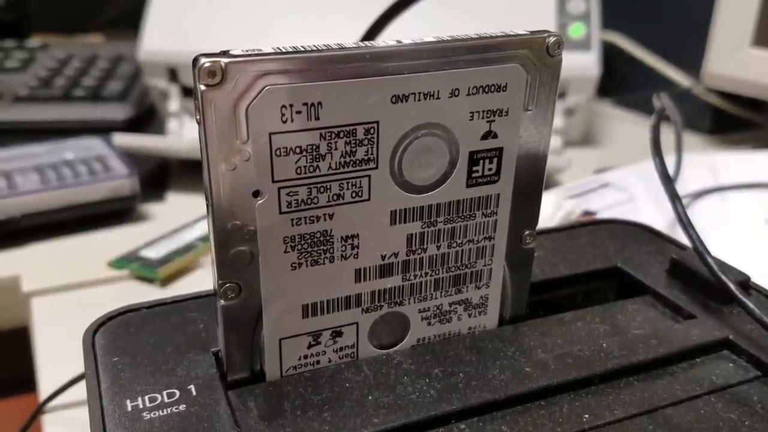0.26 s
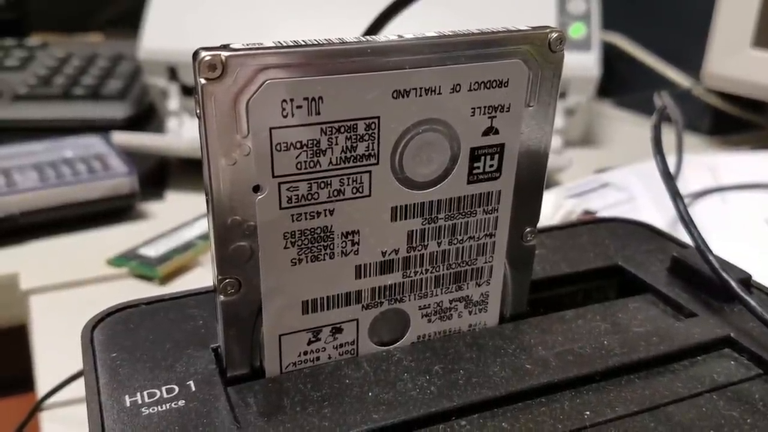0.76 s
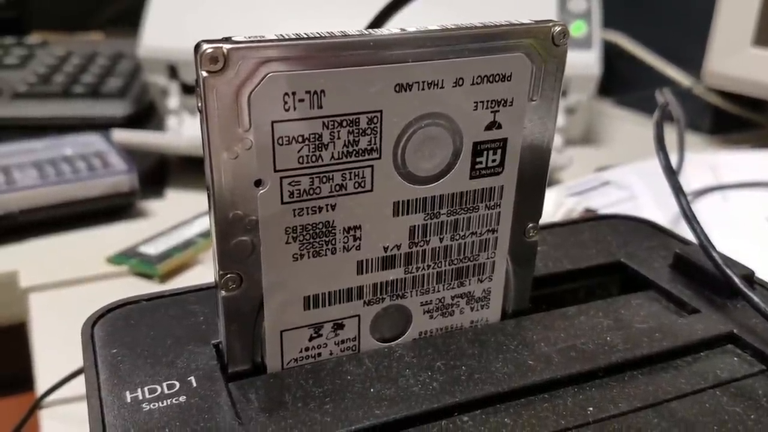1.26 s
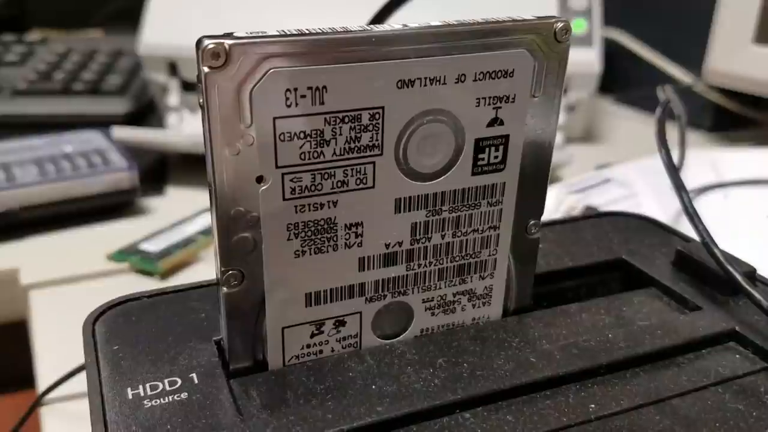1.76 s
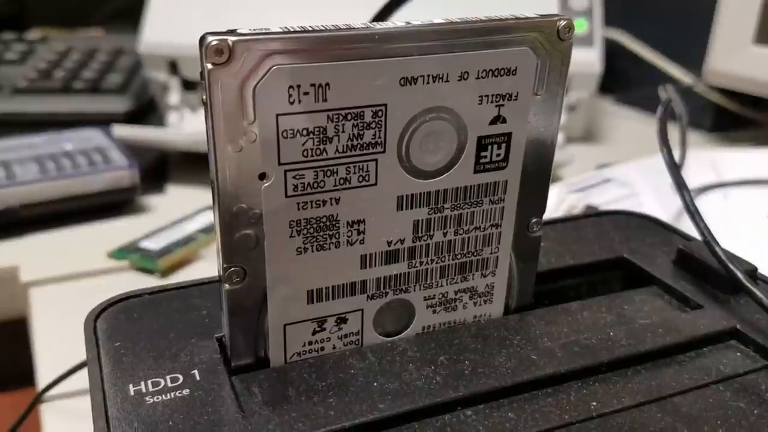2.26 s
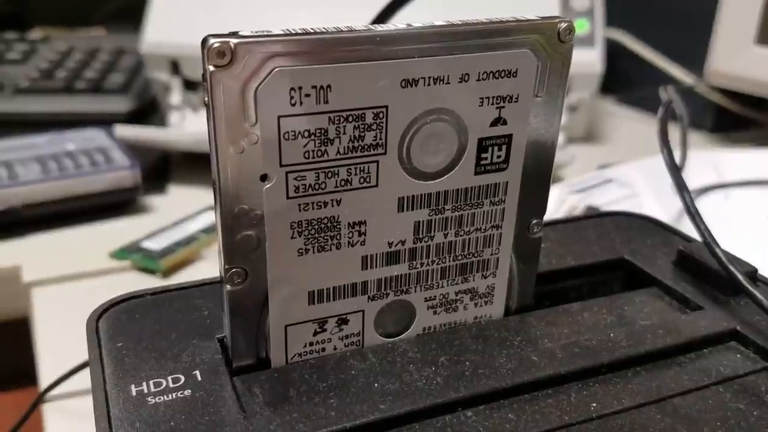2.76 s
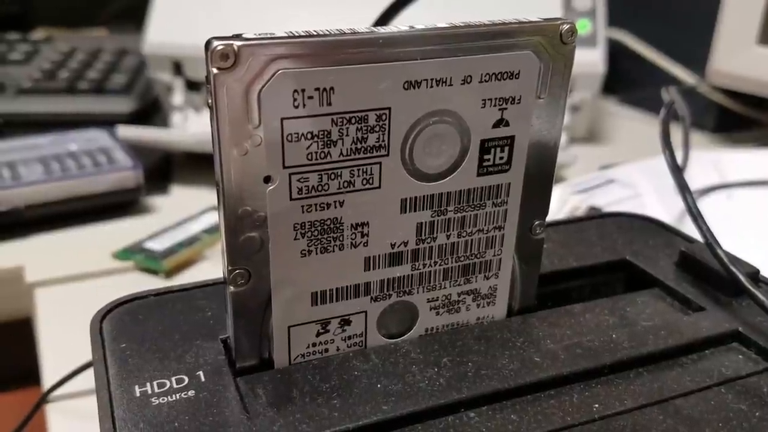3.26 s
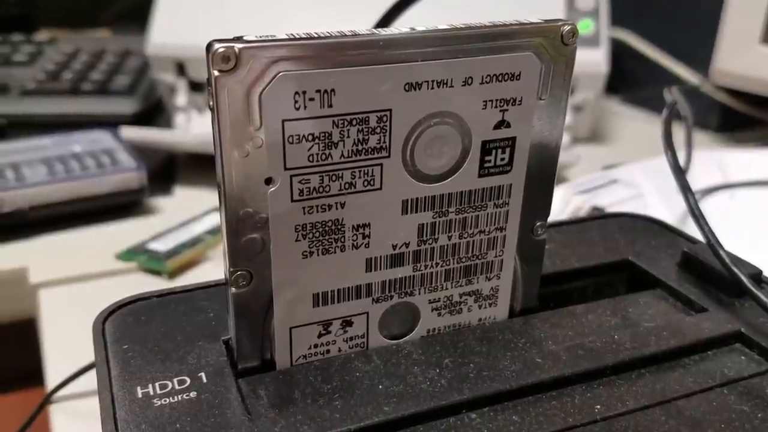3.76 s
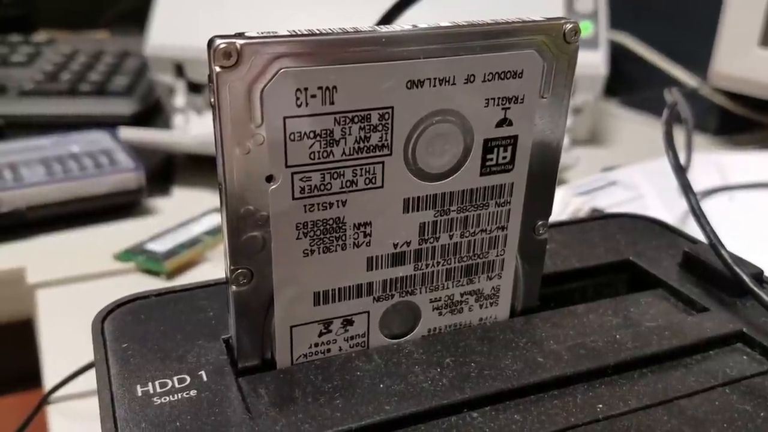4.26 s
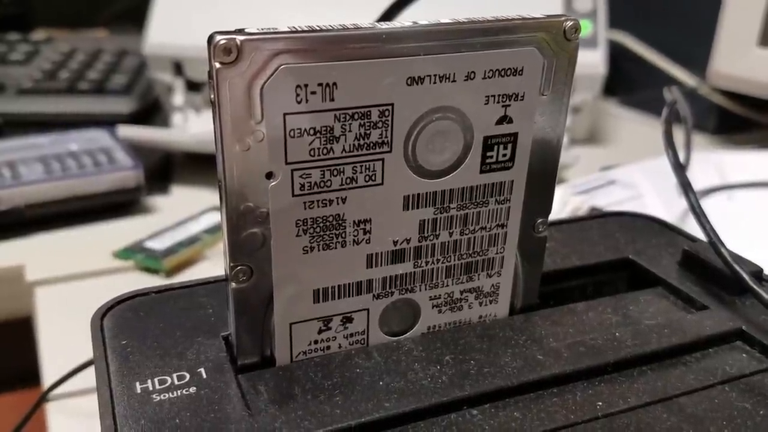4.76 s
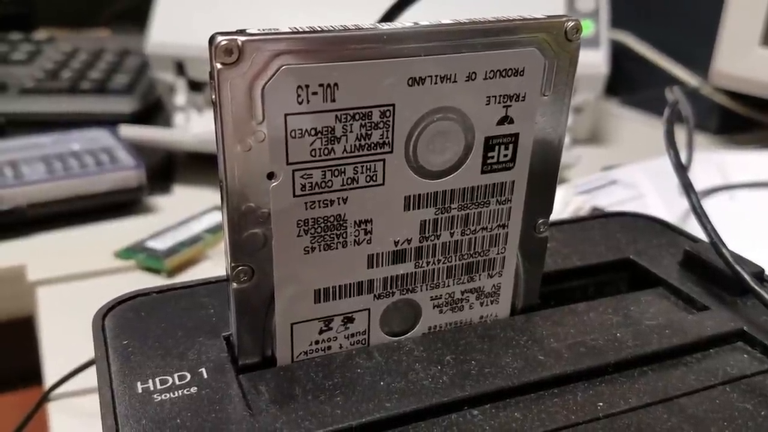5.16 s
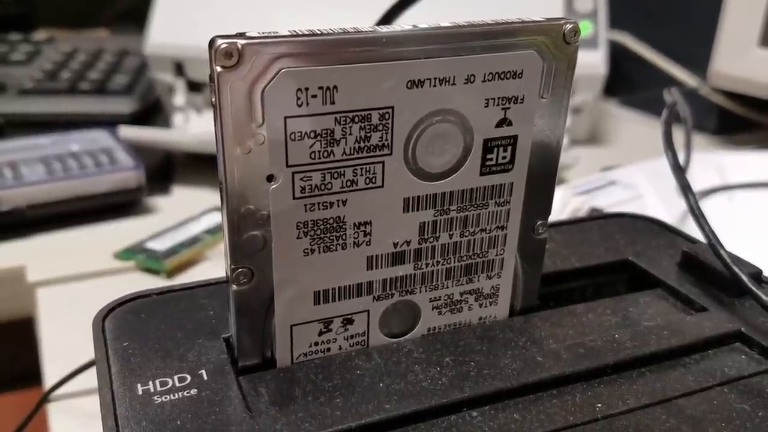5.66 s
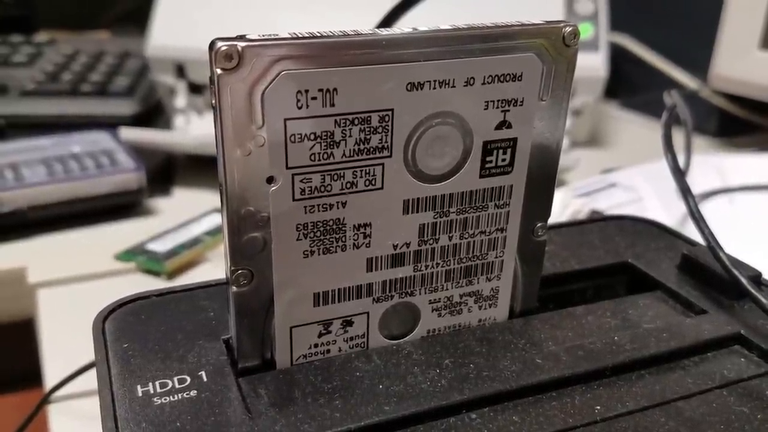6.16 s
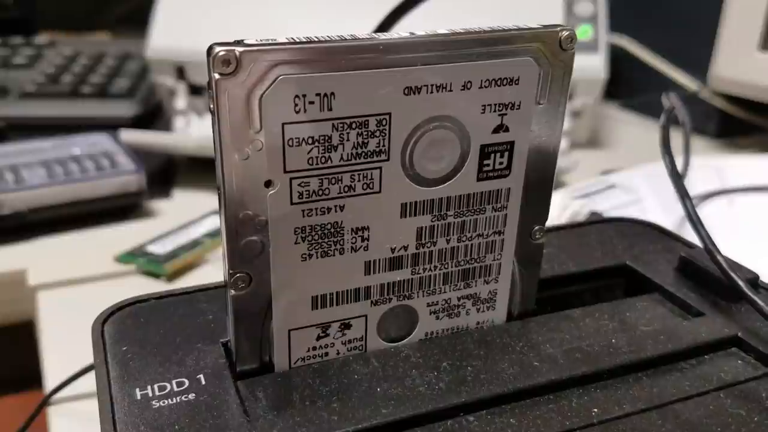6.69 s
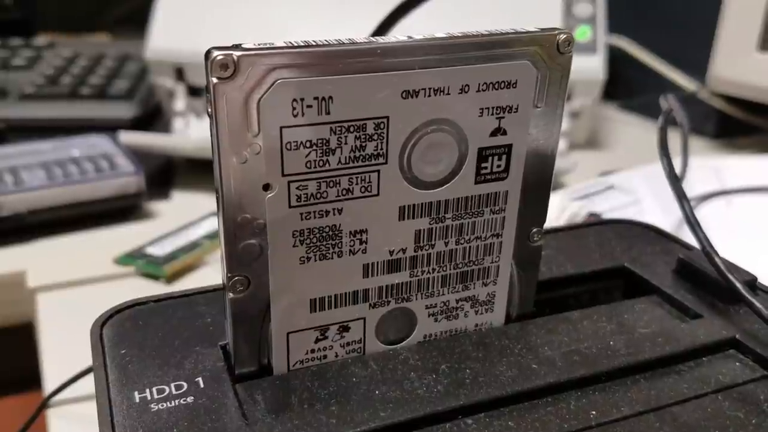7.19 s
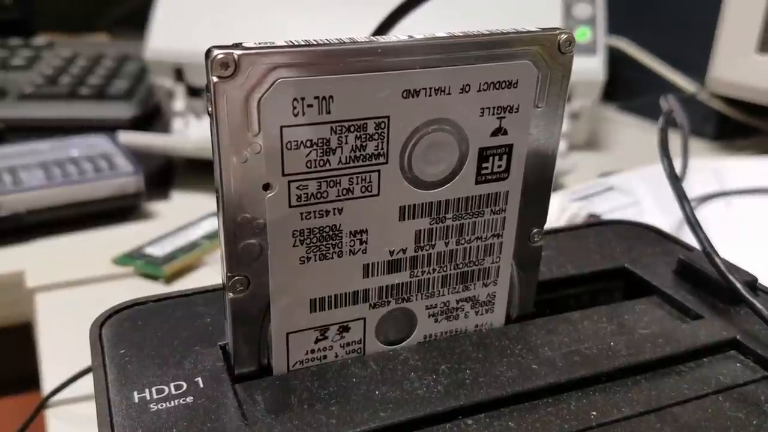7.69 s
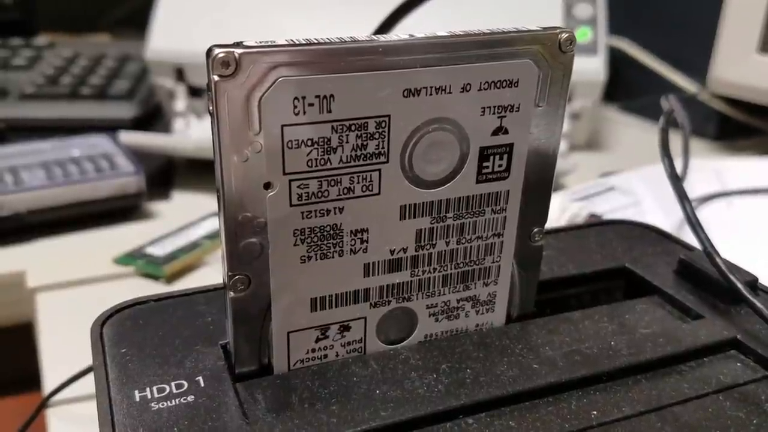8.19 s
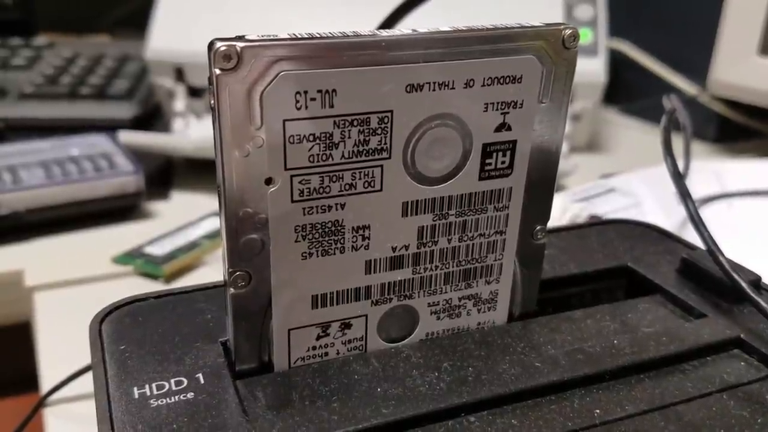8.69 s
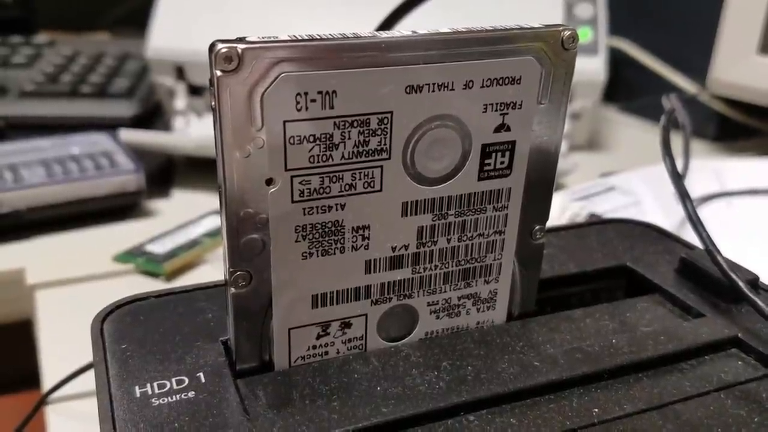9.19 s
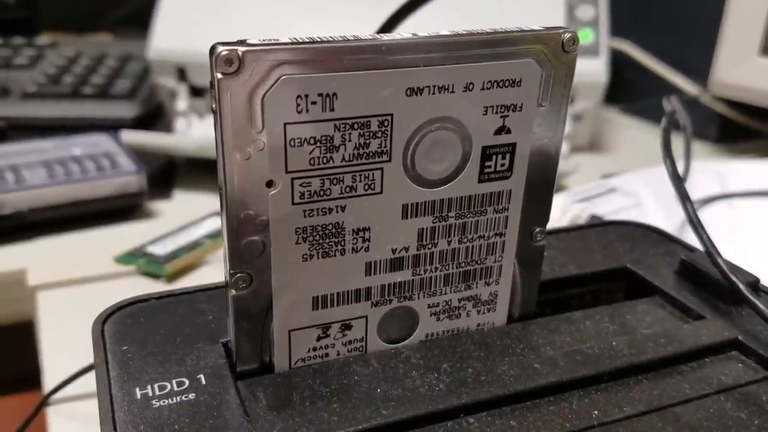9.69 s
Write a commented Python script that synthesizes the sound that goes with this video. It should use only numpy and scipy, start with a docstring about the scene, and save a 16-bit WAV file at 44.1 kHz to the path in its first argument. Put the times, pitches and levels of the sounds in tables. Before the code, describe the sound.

A failing hard drive in a desk dock is heard close up, over a steady low motor hum, a faint whine and a soft rush of air. From the start to about 1.2 seconds, and again from 1.6 to 3 seconds, it makes runs of dull knocks mixed with sharp, bright clicks, faint ticks and tiny rasps. At about 3.2 seconds it purrs softly for half a second. From 3.9 seconds the bright clicks crowd together in quick, uneven groups of two to five, with short gaps and only an occasional knock, busiest around 6 to 6.7 seconds. An electrical pop sounds on the left at 7.7 seconds and a much louder one at 8.6, while the clicking goes on. At 9.3 seconds comes a hard metallic crack with a brief rattle, then one more click near 9.9 seconds.

```python
"""A failing hard drive in a dock on a desk, stereo microphone close up, over motor hum and rushing air.
From the start the head arm swings with dull knocks and seeks in uneven runs of bright clicks, with
faint ticks and brief grinding between. At 3.2 s the head creeps across the tracks in a soft purr;
from 3.9 s the seeks crowd together. Electrical pops hit the left channel at 7.7 and 8.6 s,
and at 9.3 s the arm slams into its stop."""
import sys
import numpy as np
from scipy import signal
from scipy.fft import rfft, irfft
from scipy.io import wavfile

SR = 44100
rng = np.random.default_rng(int(sys.argv[2]) if len(sys.argv) > 2 else 0)


def pcm_store(signal):
    """Save signal as 16-bit PCM."""
    levels = np.round(np.clip(np.atleast_2d(signal), -1, 1) * 32767)
    wavfile.write(sys.argv[1], SR, levels.astype(np.int16).T)


N = 438354
SIZE = 8192   # samples in one blow and its ring
FREQS, AGE, TIME = np.fft.rfftfreq(SIZE, 1 / SR), np.arange(SIZE) / SR, np.arange(N) / SR
TURN_S = 60 / 5400   # one platter turn; the drive waits for a sector to come round, which sets its beat

# air rush of fans and platters: f/Hz, relative level/dB
AIR_SPECTRUM = [(22, -10.5), (45, -19), (85, -3), (135, 1.5), (170, -2), (235, 1), (330, -5.5), (520, -12),
                (900, -13), (1350, -17.5), (2050, -17.5), (3000, -26), (4500, -29.5), (9500, -36),
                (12000, -31.5), (15500, -28.5)]
# where the air sits between the channels: f/Hz, left over right/dB
AIR_BALANCE = [(60, -14), (150, -1), (380, 0), (950, 2.5), (2380, 1.5), (5980, -2), (15000, 2.5)]
# motor hum and whine: f/Hz, skirt half-width/Hz, level/dB, left over right/dB
MOTOR_TONES = [(57.4, 2.5, -72.5, -2), (120.3, 2.4, -62, 3.5), (155.5, 0.69, -74, -9),
               (203.8, 0.35, -66, 3), (295, 0.87, -69.5, 2), (397, 0.68, -80.5, 8), (467, 0.35, -81, 4),
               (1254, 0.72, -86, 19)]
# electrical pops: t/s, step height before filtering/dB
VOLTAGE_STEPS = [(7.7256, -13.5), (8.6215, -0.5)]

# Resonances, levels relative within each table: f/Hz, width/Hz, left/dB, right/dB
# the drive under a creeping head
CREEP_MODES = [(623, 25, 12, 15), (762, 33, 10, 3), (982, 40, 2, 8), (1880, 540, 3, 1.5),
               (4120, 62, -2, -10), (4970, 400, -14, -14), (5940, 490, -6, -6)]
# arm and lid under a short step
STEP_MODES = [(1980, 1240, 0.5, -3), (4180, 58, 8.5, 9.5), (5150, 1200, -5.5, -9), (6000, 930, 0, 2),
              (8900, 1400, -4, -12.5), (13500, 3300, -8.5, -7.5), (15800, 400, 1.5, -19)]
# the rasping pivot
PIVOT_MODES = [(1000, 1450, -5, -2), (1777, 770, 4, -13), (2360, 1070, 2, 2.5), (4102, 59, 14, 16.5),
               (4680, 920, -23, 5), (6350, 690, 6, 6.5), (8900, 4300, 1, -20.5), (14700, 2500, 3.5, -38)]
# case and dock under a swing
CASE_MODES = [(631, 29, -7, -2.5), (795, 148, 0, -7), (984, 46, 2.5, -1.5), (1054, 77, -2.5, -1.5),
              (1230, 97, -12, -10), (1557, 81, -3, -16), (1774, 116, -12.5, -4.5), (1958, 56, -3, -18),
              (2034, 58, -6.5, -6), (2160, 160, -20.5, -18), (3173, 66, -25.5, -17),
              (4830, 530, -41.5, -25.5)]
# metal on metal at the stop
STOP_MODES = [(584, 220, -21, -14), (780, 205, 1, 2.5), (1050, 270, 1, -4), (1600, 710, -6, -14),
              (2070, 270, 5, 4.5), (3140, 820, -16, -17), (6400, 2700, -23, -9), (8550, 2200, -10, -21),
              (13100, 4400, -6.5, -16), (15200, 900, -7, -13)]
# the arm flexing
FLEX_MODES = [(1940, 110, 4, 0.5), (2061, 45, 0, -22)]
# arm and lid under a seek
SEEK_MODES = [ (5070, 200, -6, 1), (5240, 200, 1, -4), (3170, 58, -16.5, -12.5), (4146, 75, -15.5, -16.5),
              (4420, 63, -34, -21.5), (6040, 405, -45, -10), (7400, 670, -23, -16), (8834, 500, -12.5, -21),
              (10470, 270, -17, -18), (12270, 260, -22.5, -25), (13300, 270, -21.5, -32),
              (14500, 1600, -34, -31), (14800, 170, -30, -17), (15740, 490, -3, -19)]

# runs of short steps, one track a turn: t/s, number of steps, relative level/dB
STEP_RUNS = [(1.496, 1, -56.5), (1.928, 1, -48.5), (2.292, 1, -49), (2.923, 1, -46.5), (3.718, 1, -57.5),
             (4.339, 2, -49), (5.24, 5, -49), (6.657, 1, -44.5), (7.619, 1, -48), (8.707, 1, -56),
             (9.164, 1, -46)]
# stretches where the arm judders: t/s, length/s, relative level/dB
JUDDERS = [(.562, .015, -53), (0.587, 0.04, -57.5), (2.535, .008, -57), (5.053, .011, -56),
           (5.139, .055, -59.5), (6.359, 0.035, -54), (9.152, 0.02, -56.5)]
# runs of slow swings: t/s, waits before each further swing/turns
SWING_RUNS = [ (.0055, [13, 19, 11, 20, 14, 13, 13]), (1.583, [11, 15, 14, 13, 19, 22, 13, 13]),
              (3.8055, [20, 37, 84]), (7.7189, []), (8.781, []), (9.251, [])]
# the arm hits its stop: t/s, relative level/dB
SLAMS = [(9.3236, -28.5)]
# runs of retried seeks: t/s, relative level/dB, flex offset/dB, waits before each further seek/turns
SEEK_RUNS = [ (.217, -29.5, -22, []), (0.2649, -38, -6, []), (.522, -31.5, -35, [18.6, 39.8]),
             (.565, -38.5, -19, [1.84, 2.1]), (1.599, -31, -37, [13.1]), (2.24, -32, -25.5, [20.5]),
             (2.4518, -38.5, -27, [6.94]), (3.8831, -30.5, -21, [4.22]),
             (4.095, -31, -21.5, [5.84, 6.04, 6]), (4.497, -38, -32, [16]),
             (4.5726, -30.5, -31, [5.9, 6.15]), (5.0551, -40, -33, [7.8]),
             (5.0745, -30.5, -24.5, [8.3, 1.5]), (5.4387, -31, -11.5, []),
             (5.504, -31, -20.5, [6.2, 5.95, 5.05]), (6.0385, -32, -22.5, [5, 6.05]),
             (6.219, -38, -22, [6.2, 7, 2.2, 11.8]), (6.2353, -30, -25, [6, 4.28, 4.8, 5.2]),
             (6.55, -30, -21, [4.5, 6.58, 6]), (7.0834, -30.5, -26, [5.95, 6.05]), (7.551, -48.5, -3.5, []),
             (7.573, -31, -32, [18.9]), (8.1273, -29.5, -30, [6]), (8.2614, -33.5, -12.5, []),
             (8.318, -30, -29.5, [4.9]), (8.8093, -31, -19.5, [4.7, 4.9]),
             (8.9728, -29, -27.5, [6, 5.95, 4.35]), (9.3114, -27, -14, []), (9.9012, -29.5, -29, [])]


def from_db(db):
    """Decibels to gain."""
    return 10 ** (np.asarray(db) / 20)


def unit_rms(x):
    """Scale to unit power."""
    return x / np.sqrt(np.mean(x ** 2) + 1e-20)


def at_hz(points, hz):
    """Read a spectrum on a log-frequency axis."""
    f, value = np.transpose(points)
    return np.interp(np.log(hz + 1), np.log(f), value)


def add(out, s, sound):
    """Mix a sound in at a time, trimmed to the scene."""
    at = round(s * SR)
    lo, hi = max(at, 0), min(at + sound.shape[-1], N)
    out[..., lo:hi] += sound[..., lo - at:hi - at]


def air_rush(level_db, shared):
    """Fans and platters stir a steady bed of air noise, partly shared by both channels."""
    hz = np.fft.rfftfreq(N, 1 / SR)
    white = rfft(rng.standard_normal((3, N)))
    stereo = np.sqrt(shared) * white[0] + np.sqrt(1 - shared) * white[1:]
    colour = from_db(at_hz(AIR_SPECTRUM, hz) + at_hz(AIR_BALANCE, hz) * [[.5], [-.5]])
    return from_db(level_db) * unit_rms(irfft(stereo * colour, N))


def motor_hum():
    """The motors hum and whine in steady tones, each with a faint wavering skirt of noise."""
    out, freqs = np.zeros((2, N)), np.fft.rfftfreq(N, 1 / SR)
    for hz, width, db, pan_db in MOTOR_TONES:
        white = rfft(rng.standard_normal(N))
        skirt = unit_rms(irfft(white / (1 + ((freqs - hz) / width) ** 2), N))
        tone = unit_rms(np.sin(2 * np.pi * hz * TIME) + .22 * skirt)
        out += tone * from_db(db + pan_db * np.array([[.5], [-.5]]))
    return out


def desk_reflections(x, t60_s, wet_db, dull_hz):
    """Clutter on the desk scatters a short, slightly dull tail behind the direct sound."""
    onset = 1 - np.exp(-(AGE / .008) ** 2)
    tail = rng.standard_normal((2, SIZE)) * from_db(-60 * AGE / t60_s) * onset
    tail *= from_db(wet_db) / np.sqrt(np.sum(tail ** 2) / 2)
    tail = signal.sosfilt(signal.butter(1, dull_hz, fs=SR, output="sos"), tail)
    return x + signal.oaconvolve(x, tail, axes=1)[:, :N]


def electrical_pops(highpass_hz, edge_hz):
    """A voltage step in the left channel swings back through the input's bass cut."""
    out = np.zeros((2, N))
    pop = signal.sosfilt(signal.butter(3, highpass_hz, "high", fs=SR, output="sos"), np.ones(SIZE))
    pop = signal.sosfilt(signal.butter(1, edge_hz, fs=SR, output="sos"), pop)
    for s, db in VOLTAGE_STEPS:
        add(out[0], s, from_db(db) * pop)
    return out


def resonances(modes, offsets_db):
    """Stereo response of steep-sided modes, made minimum phase so that they ring after the blow."""
    power = 0
    for (hz, width, left, right), db in zip(modes, offsets_db):
        peak = from_db([[left + db], [right + db]]) / (1 + (2 * (FREQS - hz) / width) ** 2)
        power = power + peak ** 2
    cepstrum = irfft(np.log(power / power.mean() + 1e-5) / 2)
    cepstrum[:, 1:SIZE // 2] *= 2
    cepstrum[:, SIZE // 2 + 1:] = 0
    return np.exp(rfft(cepstrum))


def whiten(grain):
    """Give a burst equal energy at all pitches."""
    spectrum = rfft(grain)
    return irfft(spectrum / (abs(spectrum) + 1e-12))


def shove(rise_s, fall_s):
    """A brief rattling force that swells and dies, as a function from noise to force spectrum."""
    def force(grain):
        envelope = (1 - np.exp(-(AGE / rise_s) ** 3)) * np.exp(-AGE / fall_s)
        for _ in range(4):
            grain = whiten(grain * envelope)
            envelope = np.sqrt(envelope / envelope.max())
        return rfft(grain * envelope)
    return force


def stroke(length_s):
    """The arm speeds up and brakes in a rounded burst, as a function from noise to force spectrum."""
    def force(grain):
        envelope = np.sin(np.pi * np.minimum(AGE / length_s, 1))
        for _ in range(3):
            grain = whiten(grain * np.sqrt(envelope))
        return rfft(grain * envelope)
    return force


def blows(moves, modes, force, lead_s, variety, scatter_db, gain_db):
    """The servo repeats one force on each move; variety adds fresh noise, scatter varies the modes."""
    out, repeated = np.zeros((2, N)), rng.standard_normal(SIZE)
    response = resonances(modes, np.zeros(len(modes)))
    for (s, db), fresh in zip(moves, rng.standard_normal((len(moves), SIZE))):
        if scatter_db:
            response = resonances(modes, scatter_db * fresh[-len(modes):])
        ring = irfft(response * force(repeated + variety * fresh))
        add(out, s - lead_s, from_db(db + gain_db) * ring)
    return out


def on_turns(start_s, waits):
    """Times of a run of moves that are so many platter turns apart."""
    return start_s + TURN_S * np.cumsum([0, *waits])


def swing_times():
    """The time of every swing of every run."""
    return [s for start, waits in SWING_RUNS for s in on_turns(start, waits)]


def seek_moves(return_flex_db=6.5):
    """Seeks go out and back in turn, flexing more on the way back: t/s, level/dB, flex offset/dB."""
    return [(s, db, flex + return_flex_db * (k % 2))
            for start, db, flex, waits in SEEK_RUNS for k, s in enumerate(on_turns(start, waits))]


def head_creep(start_s, end_s, per_s):
    """The head creeps from track to track in a faint, slightly uneven purr."""
    times = np.arange(start_s, end_s, 1 / per_s)
    moves = [(s + .0014 * rng.normal(), -65.5 + 1.7 * rng.normal()) for s in times]
    return blows(moves, CREEP_MODES, shove(rise_s=.0033, fall_s=.0072),
                 lead_s=0, variety=1.7, scatter_db=-1, gain_db=24)


def head_steps(settle_turns, lead_in_s, lead_in_share):
    """Faint ticks as the head settles after a swing, leads into a seek or walks from track to track."""
    settling = [(s + settle_turns * TURN_S, -55.5 + 2.5 * rng.normal()) for s in swing_times()]
    leading = [(s - lead_in_s, -47) for s, _, _ in seek_moves() if rng.random() < lead_in_share]
    walking = [(start + k * TURN_S, db) for start, count, db in STEP_RUNS for k in range(count)]
    return blows(settling + walking + leading, STEP_MODES, shove(rise_s=.00187, fall_s=.0052),
                 lead_s=.004, variety=1.4, scatter_db=.5, gain_db=20.5)


def pivot_grinding(per_s, spread_db):
    """Dense, uneven slips of the juddering arm rasp through the pivot."""
    slips = []
    for start, length, db in JUDDERS:
        for k, (late, size) in enumerate(rng.standard_normal((40, 2))):
            if k / per_s < length:
                slips.append((start + (k + .3 * late) / per_s, db + spread_db * size))
    return blows(slips, PIVOT_MODES, stroke(length_s=.005),
                 lead_s=.001, variety=7.4, scatter_db=-.5, gain_db=25)


def arm_swings():
    """A smooth push on the arm shakes the low modes of the case: nearly the same dull knock each time."""
    return blows([(s, -45) for s in swing_times()], CASE_MODES, stroke(length_s=.00928),
                 lead_s=.0029, variety=.047, scatter_db=0, gain_db=28)


def arm_slam():
    """The arm hits its stop, metal on metal: a hard crack, then a short rattle."""
    crack = blows(SLAMS, STOP_MODES, stroke(length_s=.0072),
                  lead_s=.0021, variety=0, scatter_db=1, gain_db=28)
    rattle = blows(SLAMS, STOP_MODES, shove(rise_s=.00366, fall_s=.011),
                   lead_s=0, variety=0, scatter_db=1.5, gain_db=24)
    return crack + rattle


def arm_seeks():
    """Each long seek rings the bright modes and flexes the arm; the pivot rasps even on weak ones."""
    moves = seek_moves()
    clicks = blows([(s, db) for s, db, _ in moves], SEEK_MODES, stroke(length_s=.00674),
                   lead_s=.0043, variety=.5, scatter_db=3, gain_db=23)
    flexing = blows([(s, db + flex) for s, db, flex in moves], FLEX_MODES, stroke(length_s=.00674),
                    lead_s=.0048, variety=.67, scatter_db=4, gain_db=23.5)
    rubs = [(s, .34 * db + .3 * flex) for s, db, flex in moves]
    rasp = blows(rubs, PIVOT_MODES, shove(rise_s=.00122, fall_s=.0059),
                 lead_s=.0045, variety=4.3, scatter_db=-.5, gain_db=-7)
    return clicks + flexing + rasp


def scene():
    """The drive close up on its desk, a little left of the microphone's centre, over air and hum."""
    drive = arm_seeks() + head_steps(settle_turns=5, lead_in_s=.017, lead_in_share=.2)
    drive += arm_swings() + arm_slam() + pivot_grinding(per_s=360, spread_db=4)
    drive += head_creep(start_s=3.23, end_s=3.66, per_s=90)
    drive[1] = np.interp(TIME - 52e-6, TIME, drive[1])   # reaches the right side 52 microseconds later
    at_microphone = desk_reflections(drive, t60_s=.19, wet_db=-11.5, dull_hz=8340)
    background = air_rush(level_db=-60.5, shared=.37) + motor_hum()
    return at_microphone + background + electrical_pops(highpass_hz=112, edge_hz=2300)


def record(dry):
    """The recorder cuts the top steeply at 16 kHz."""
    lowpass = signal.firwin(151, 16000, fs=SR, window="blackman")
    return signal.fftconvolve(dry, [lowpass], mode="same", axes=1)


dry = scene()
out = record(dry)
pcm_store(out)
```